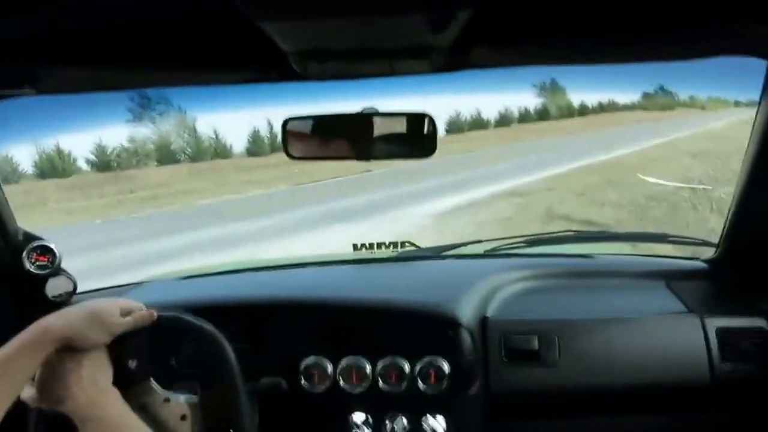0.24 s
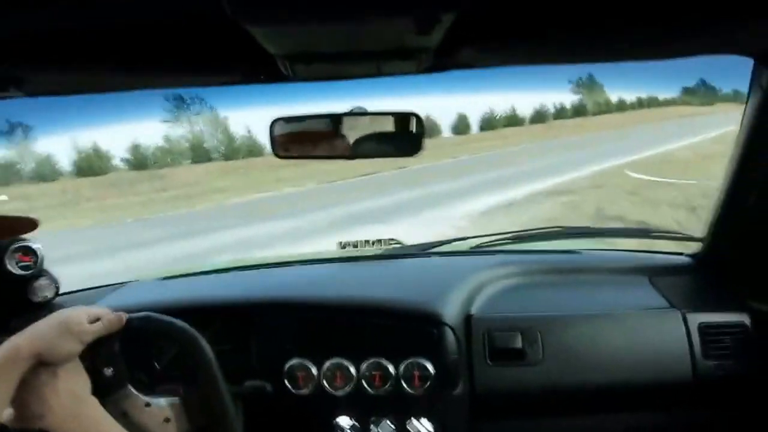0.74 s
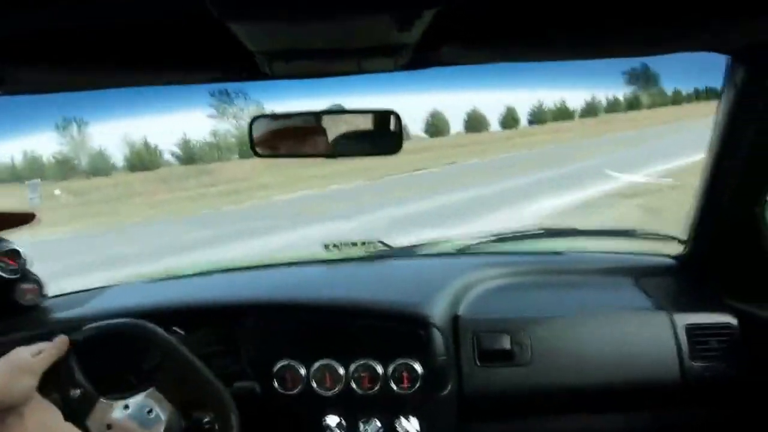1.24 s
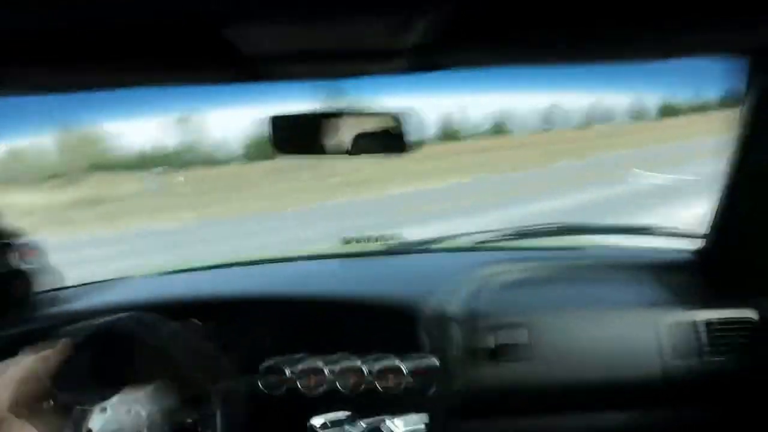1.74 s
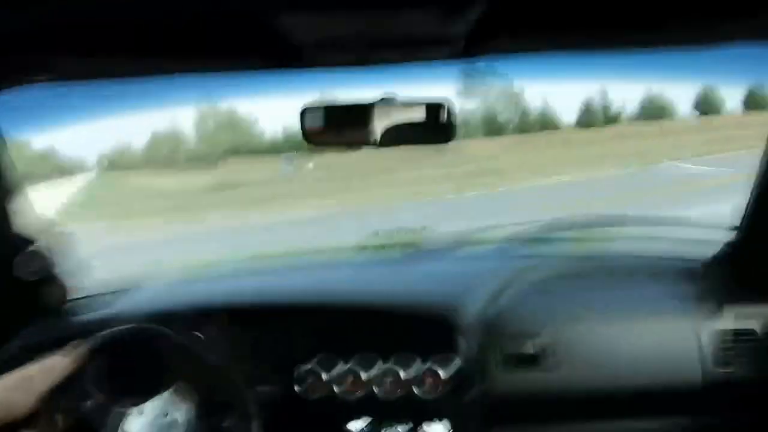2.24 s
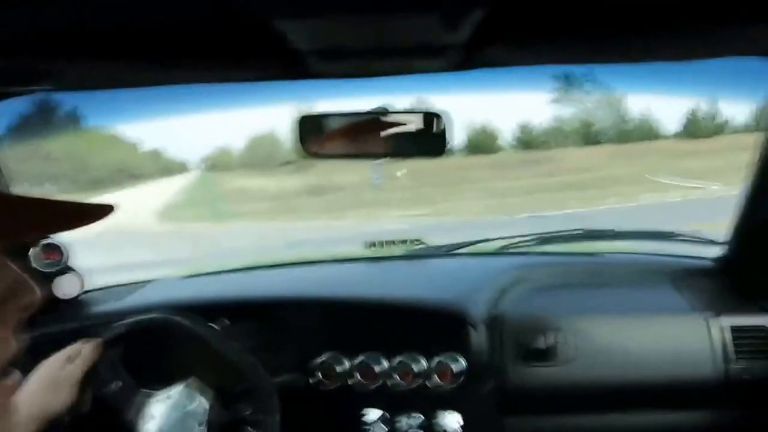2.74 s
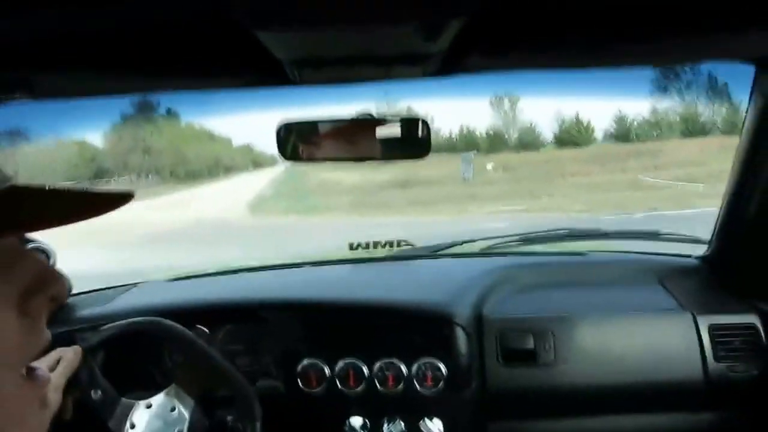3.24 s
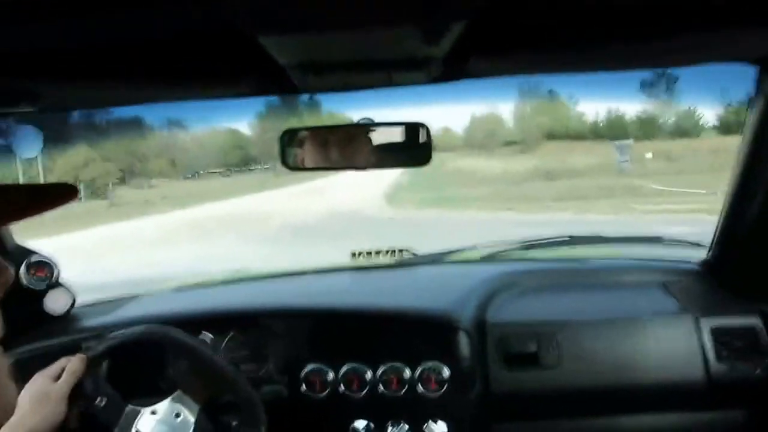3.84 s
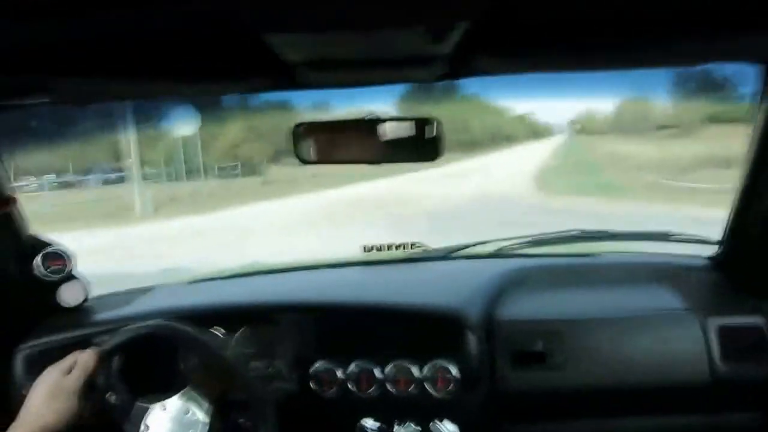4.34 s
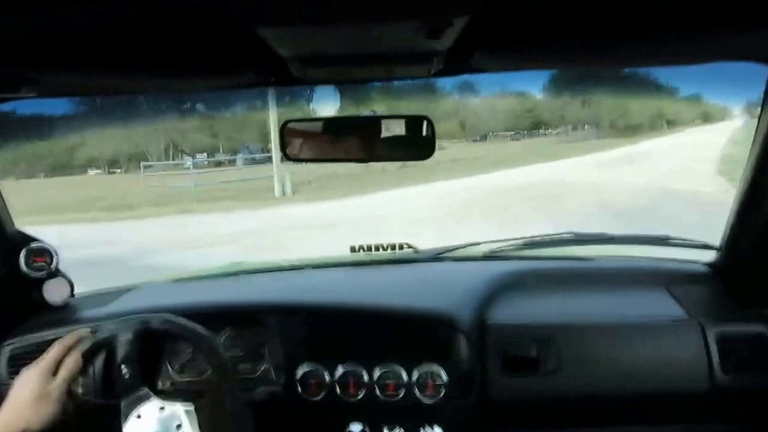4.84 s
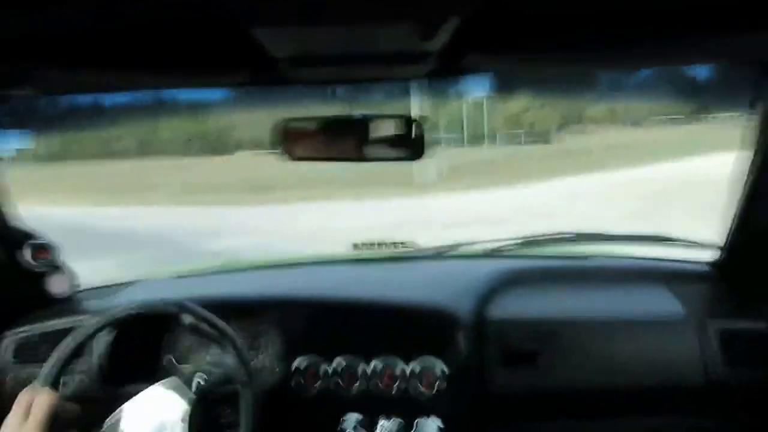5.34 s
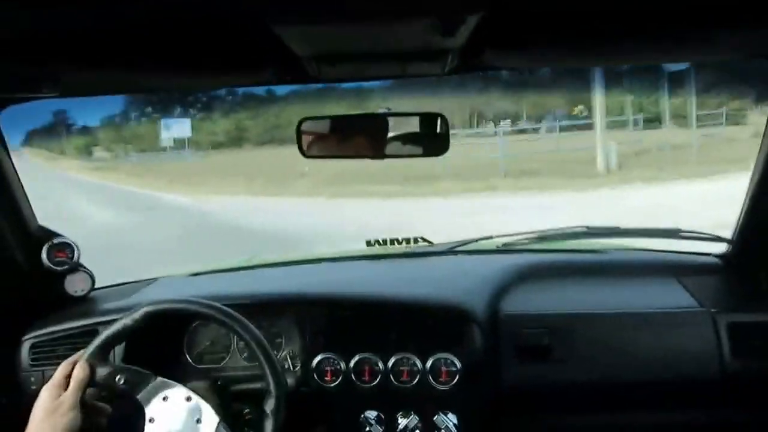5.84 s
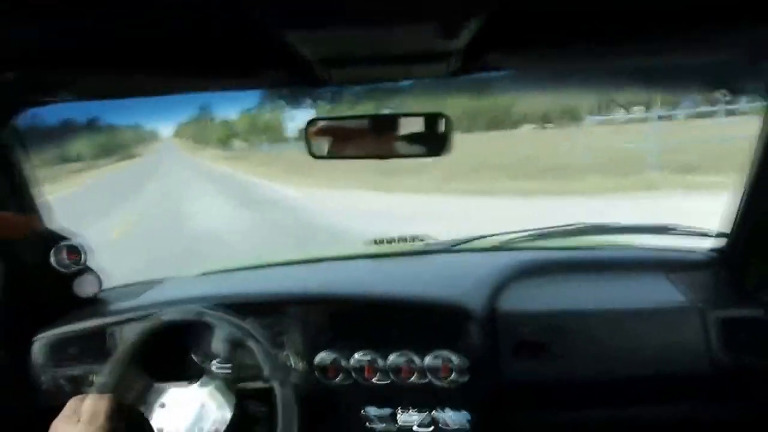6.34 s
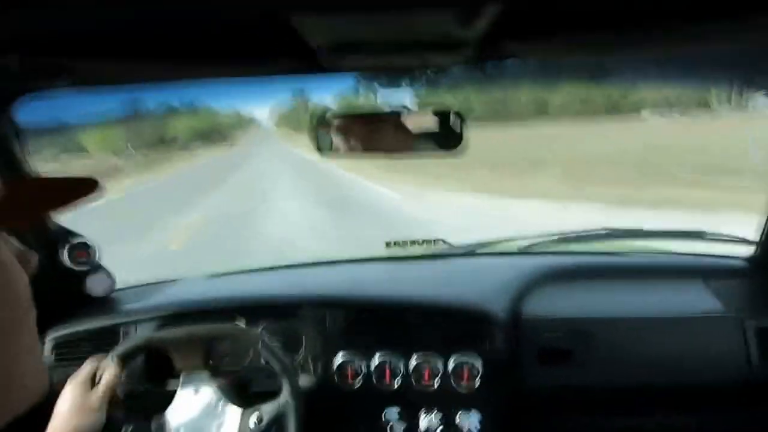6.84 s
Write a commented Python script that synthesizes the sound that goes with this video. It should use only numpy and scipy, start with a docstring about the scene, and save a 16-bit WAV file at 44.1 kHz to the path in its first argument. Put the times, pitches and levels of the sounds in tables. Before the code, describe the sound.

Inside a moving car, a deep engine drone sags, rises and sags again, with bursts of hard plastic rattle, then climbs toward the end.

```python
"""Inside the cabin of a moving car, a camera on a mount hears the engine beat rise, sag and rise again.
The engine is a stack of tones locked to its turns and coloured by the cabin, over a noise rumble.
Shaking makes the camera housing buzz and, in spells, knock on its mount: small and large blows set
it ringing, in opposite phase at the two microphones. Trim rasps with the shaking.
A faint whine, treble hiss and the swish of hands on the wheel are shaped noise."""
import sys
import numpy as np
from scipy import signal
from scipy.fft import rfft, irfft, next_fast_len
from scipy.io import wavfile
from scipy.ndimage import uniform_filter1d

SR = 44100
rng = np.random.default_rng(int(sys.argv[2]) if len(sys.argv) > 2 else 0)


def store_wav(level_fs):
    """Save 16-bit WAV to argv[1]."""
    pcm = np.round(np.clip(np.atleast_2d(level_fs), -1, 1) * 32767)
    wavfile.write(sys.argv[1], SR, pcm.T.astype(np.int16))


N = 313103   # length in samples

# An "order" is a tone at a whole number of times the engine's turning rate.
# engine speed: t/s, speed/turns per s
ENGINE_SPEED = [(0.0, 43.81), (0.25, 42.57), (0.5, 40.8), (0.9, 38.44), (1.36, 38.36), (1.62, 35.17),
                (1.74, 32.7), (1.85, 30.72), (2.06, 38.0), (2.16, 42.15), (2.29, 46.59), (2.5, 48.77),
                (2.9, 44.94), (3.2, 41.69), (3.42, 38.84), (3.66, 41.55), (3.9, 50.32), (4.05, 50.53),
                (4.35, 44.68), (4.6, 38.72), (4.81, 35.92), (5.3, 39.92), (5.7, 43.16), (6.1, 46.22),
                (6.45, 48.94), (7.1, 54.11)]
# throttle, as the common level of the low orders before exhaust and cabin shares: t/s, level/dB
THROTTLE = [(0, -22.3), (.45, -22), (.9, -22.5), (1.36, -22.5), (1.6, -25), (1.72, -29), (1.85, -30),
            (2.06, -32.7), (2.2, -25), (2.32, -25), (2.5, -25.5), (2.9, -29), (3.2, -30), (3.42, -30.5),
            (3.62, -27), (3.78, -23), (3.92, -22.5), (4.05, -27), (4.35, -28), (4.6, -32), (4.81, -32),
            (5.3, -27), (5.7, -23.6), (6.1, -20.5), (6.45, -27), (6.75, -29.5), (7.1, -25.5)]
# strength of orders 1 to 5 at the exhaust, with three firings a turn: level/dB
LOW_ORDERS_DB = [-0.1, 0.63, 3.5, -0.52, -0.35]
# strength of orders 6 to 13 at the exhaust: level/dB
UPPER_ORDERS_DB = [2, 2, -0.5, -1.5, 1.0, -3.5, -6, -4.5]
# how the cabin passes the low orders: f/Hz, level/dB
CABIN_LOW = [(30, -3), (38, 4.5), (44, -2.6), (54, -0.5), (72, -4.7), (82, 3.5), (92, -1), (104, 8.5),
             (113, 5.5), (121, 0), (131, 3.5), (143, 1), (155, -2), (175, -3.9), (200, -2.5), (220, -1.5),
             (240, -2), (270, -15.5)]
# how the cabin passes orders 6 to 13, against the low orders together: f/Hz, level/dB
CABIN_UPPER = [(190, -21), (232, -14), (260, -29), (285, -26), (310, -27.5), (345, -36), (385, -27),
               (420, -49.5), (460, -29.5), (540, -67)]
# orders 6 to 13 carried by the mount, against the low orders together: f/Hz, level/dB
MOUNT_CARRIED = [(240, -47), (285, -44.5), (325, -49), (365, -25.5), (410, -48), (540, -53.5)]
# colour of the road and body rumble: f/Hz, level/dB per Hz
RUMBLE_COLOUR = [(25, -10.5), (60, -6.5), (140, -2.5), (250, -5), (340, -7.5), (420, -13.5), (460, -9),
                 (510, -18), (700, -20.5), (1200, -32), (2300, -37), (3500, -49.5), (6000, -53.5)]
# ringing of the rasping trim: f/Hz, level/dB, time to die by 60 dB/s
TRIM_MODES = [(1350, -1.5, 0.0032), (1670, -8, 0.02), (2718, 6.5, 0.0034), (3260, -3.5, 0.0069),
              (4600, -6, 0.0023), (12700, -14.5, 0.0018)]
# the whine's one resonance: f/Hz, level/dB, time to die by 60 dB/s
WHINE_MODE = [(2320, 0, 0.033)]
# ringing of the camera housing: f/Hz, level/dB, time to die by 60 dB/s
HOUSING_MODES = [(370, -8, .015), (590, -6, .026), (855, -2, .03), (1085, -1, .032), (1340, -4, .032),
                 (1650, -9, .014), (1930, -12, .016), (2500, -19, .012)]
# ringing of the dash panel, heard through the air: f/Hz, level/dB, time to die by 60 dB/s
PANEL_MODES = [(537, -15, 0.0076), (894, -15.5, 0.013), (1102, -28, 0.073), (1490, -14, 0.0022),
               (1992, -34.5, 0.04), (2730, -25.5, 0.011)]
# colour of the bright contact ticks: f/Hz, level/dB per Hz
TICK_COLOUR = [(2500, 3), (5000, 7.5), (8000, -0.5), (12000, 2), (16000, -4.5)]
# spells of loose rattle: start t/s, end t/s, level/dB before softening and the mount
RATTLE_SPELLS = [(1.71, 1.944, -23.5), (2.02, 2.1, -18.5), (2.194, 2.316, -22), (2.52, 2.83, -18.5),
                 (3.97, 4.335, -22.5), (6.274, 6.806, -19.5), (6.9, 7.1, -26)]
# the loudest knocks and lone ticks: t/s, blow level/dB before ringing, tick level/dB before smoothing
LOUD_KNOCKS = [(1.6728, -10, -29), (1.6986, -8, -50), (1.7105, -5, -29), (1.728, -6.5, -22),
               (1.7674, -14, -49), (1.7956, -9.5, -29), (1.8457, -10.5, -53), (1.8559, -8.5, -23),
               (1.8893, -10, -24), (1.909, -13.5, -46), (1.9409, -10, -29), (1.972, -9, -28),
               (2.0345, -13, -33), (2.046, -14, -38), (2.158, -12.5, -39), (2.2273, -10, -35),
               (2.252, -8.5, -46), (2.2623, -14, -27), (2.3197, -10, -40), (2.3275, -25, -27),
               (2.3921, -12.5, -27), (2.5163, -32, -21.5), (2.5316, -9.5, -44), (2.5712, -17, -50),
               (2.5796, -11, -23), (2.6405, -14.5, -34), (2.662, -15, -26), (2.6828, -9, -27),
               (2.7053, -10, -29), (2.747, -12, -30), (2.769, -13, -34), (2.8106, -13, -37),
               (2.8448, -9, -34), (2.9178, -15.5, -32), (3.0405, -39, -31.5), (3.2868, -42, -35),
               (3.5967, -47, -31.5), (3.9868, -9.5, -30), (4.0318, -10.5, -28), (4.0534, -12.5, -25),
               (4.0718, -13, -29), (4.0938, -10.5, -27), (4.1293, -10.5, -30), (4.1677, -11, -28),
               (4.2302, -11.5, -36), (4.2751, -9, -30), (4.298, -11.5, -25), (4.3183, -13, -30),
               (4.3392, -9.5, -30), (4.3609, -9.5, -29), (4.681, -32, -36), (4.7666, -31, -34),
               (5.507, -52, -31), (5.7506, -45, -32.5), (6.209, -17.5, -31.5), (6.268, -10, -50),
               (6.2752, -9.5, -30), (6.316, -11, -29), (6.3389, -11, -33), (6.3595, -10, -30),
               (6.38, -13, -25), (6.4213, -13, -38), (6.464, -10.5, -28), (6.4858, -12.5, -30),
               (6.519, -13.5, -40), (6.5477, -16, -28), (6.5814, -11.5, -30), (6.6226, -9, -31),
               (6.6497, -10, -25.5), (6.6661, -17, -36), (6.6887, -11, -25), (6.7295, -10, -30),
               (6.7663, -10, -32), (6.804, -19, -48), (7.0701, -44, -31)]
# colour of the treble hiss and hand swish: f/Hz, level/dB per Hz
HISS_COLOUR = [(2350, -45), (4000, -1), (5950, 0), (6750, 1.5), (8110, 3.5), (12700, 6.5), (14700, -9),
               (15800, -23.5)]
# hands sliding on the wheel: middle t/s, length/s, level/dB at the middle before the waver
HAND_SLIDES = [(5.08, 0.32, -58.5), (5.23, 0.23, -61), (5.345, 0.19, -60), (5.58, 0.37, -57.5),
               (6.023, .45, -55)]

BOOM_HZ, BOOM_Q, START_RAD = 125.0, 1.6, 2.4   # cabin boom; engine angle at the start
LEFT_CUT_HZ, LEFT_DB = 90.0, 2.4               # bass leak and gain, for airborne engine sound
# body shake: peak and half-width in turns per s, dB of shake per dB of throttle, reference throttle
SHAKE_HZ, SHAKE_WIDTH_HZ, SHAKE_PER_DB, OPEN_DB = 39.28, 0.64, 1.64, -22
RUMBLE_DB = -14.5                              # against the low orders together
RASP_DB, RASP_FOLLOWS = -41.5, 1.19            # rasp at 0 dB shake; dB of rasp per dB of shake
RASP_IN_SPELL_DB = -33                         # rasp against the level of a rattle spell
BUZZ_DB, BUZZ_FOLLOWS = -23.5, 0.78            # before softening and mount; dB per dB of shake
BORNE_DB = -2.5                                # housing ring that reaches the microphones
SPELL_RISE_DB_PER_S, SPELL_FALL_DB_PER_S = 90, 89
# lighter knocks: angle in the turn, chance per turn
LIGHT_RAD, LIGHT_SHARE = 0.866, .6
# their blow and tick against the spell, before the scatter; scale of the scatter
LIGHT_DB, LIGHT_TICK_DB, LIGHT_SPREAD_DB = -1.5, -26.5, 2
HISS_DB, HISS_FOLLOWS = -64.5, 0.44            # hiss at 0 dB shake; dB per dB of shake
CUTOFF_HZ = 15800                              # top of the microphones' range
OPPOSITE = [[1], [-1]]                         # left and right in opposite phase


def from_db(db):
    """Turn decibels into a plain gain."""
    return np.exp(np.asarray(db) * (np.log(10) / 20))


def power_sum(*levels_db):
    """Level in dB of several unrelated sounds together."""
    return 10 * np.log10(sum(from_db(2 * np.asarray(db)) for db in levels_db))


def rms_one(x):
    """Scale a sound to an rms level of 1."""
    return x / np.sqrt(np.mean(x ** 2) + 1e-20)


def in_time(rows):
    """Join the points of a time table with straight lines, one curve per column."""
    s, *columns = np.transpose(rows)
    return [np.interp(np.arange(N) / SR, s, column) for column in columns]


def at_hz(points, hz):
    """Read a level off a frequency table, joining its points on a log scale."""
    table = np.array(points)
    return np.interp(np.log(hz), np.log(table[:, 0]), table[:, 1])


def drift(rate):
    """Slow random wander of spread 1, around a rate in Hz."""
    step = 40   # made at a 40th of the sample rate, then joined up
    r = np.exp(-2 * np.pi * step * rate / SR)
    noise = rng.standard_normal(N // step + 2002)
    slow = signal.lfilter([1], [1, -2 * r, r * r], noise)[2000:]
    return np.interp(np.arange(N) / step, np.arange(len(slow)), rms_one(slow))


def coloured(spectrum, alike):
    """Steady stereo noise with a given colour and left-right likeness, at rms 1."""
    size = next_fast_len(N)
    hz = np.maximum(np.fft.rfftfreq(size, 1 / SR), 1)
    gain = from_db(at_hz(spectrum, hz))
    mid, side = irfft(rfft(rng.standard_normal((2, size))) * gain, size)[:, :N]
    alike = np.clip(alike, -1, 1)
    return rms_one(np.sqrt(1 + alike) * mid + np.sqrt(1 - alike) * side * OPPOSITE)


def ring(clicks, modes, scatter_db):
    """Clicks set each mode ringing with a wandering share; neighbouring modes swing in opposite sense."""
    out = 0
    for k, (hz, level_db, t60) in enumerate(modes):
        r = from_db(-60 / (t60 * SR))
        w = 2 * np.pi * hz / SR
        share = (-1) ** k * from_db(level_db + scatter_db * drift(29))
        driven = clicks * share + 1e-18
        out = out + signal.lfilter([0, np.sin(w)], [1, -2 * r * np.cos(w), r * r], driven)
    return out


def touches(angle, per_s, turn, depth):
    """Dense small contacts, strongest at one angle (rad) of each turn, with a wandering strength."""
    bunch = np.exp(depth * np.cos(angle - turn) + .18 * drift(25))
    return (rng.random(N) < per_s / SR) * rng.uniform(-1.24, 1, N) * bunch


def engine(turns, throttle_db):
    """Tones locked to the turning engine; the cabin boom shifts their timing and colours the low ones."""
    angle = START_RAD + 2 * np.pi * np.cumsum(turns) / SR
    air, carried = 0, 0
    low_db = [throttle_db + db + at_hz(CABIN_LOW, (k + 1) * turns) for k, db in enumerate(LOW_ORDERS_DB)]
    load_db = power_sum(*low_db)
    for k in range(1, 14):
        hz = k * turns
        low = k <= len(low_db)
        if low:
            level_db = low_db[k - 1]
        else:
            level_db = load_db + at_hz(CABIN_UPPER, hz) + UPPER_ORDERS_DB[k - 6] + 2.8 * drift(3.3)
        lag = 1.5 * np.arctan2(hz / BOOM_HZ / BOOM_Q, 1 - (hz / BOOM_HZ) ** 2) - 3.35
        wobble = .02 * k * drift(9)      # small unevenness in the beat
        wave = np.sqrt(2) * np.cos(k * angle - lag + wobble)
        air = air + from_db(level_db + 0.57 * drift(2.3)) * wave
        if not low:
            carried = carried + from_db(load_db + at_hz(MOUNT_CARRIED, hz)) * wave
    return np.array([left_port(air) + carried, air - carried]), angle, load_db


def left_port(x):
    """The left microphone loses bass through a leak, and is a little louder above it."""
    return from_db(LEFT_DB) * signal.lfilter(*signal.butter(1, LEFT_CUT_HZ, "high", fs=SR), x)


def shake(turns, throttle_db):
    """Body shake in dB: a resonance in engine speed plus throttle; 0 dB at its peak at OPEN_DB."""
    off_peak = (turns - SHAKE_HZ) / SHAKE_WIDTH_HZ
    return SHAKE_PER_DB * (throttle_db - OPEN_DB) - 10 * np.log10(1 + off_peak ** 2)


def road_rumble(load_db):
    """Road and body rumble: coloured noise that follows the engine level with a slow waver."""
    waver_db = 1.2 * drift(8)
    return from_db(load_db + RUMBLE_DB + waver_db) * coloured(RUMBLE_COLOUR, alike=0.42)


def trim_rasp(angle, level_db):
    """Many small contacts ring the trim; part is shared by the microphones, part is in opposite phase."""
    shared, own = (rms_one(ring(touches(angle, per_s=5000, turn=5.5, depth=.8), TRIM_MODES, scatter_db=2))
                   for _ in range(2))
    return from_db(level_db) * (shared + 0.6 * own * OPPOSITE)


def whine():
    """Noise through one narrow resonance makes a faint, wavering whine."""
    return from_db(-65.5) * rms_one(ring(rng.standard_normal(N), WHINE_MODE, scatter_db=0))


def housing(angle, spell_db, buzz_db):
    """Contacts ring the housing in opposite phase, ring the panel through the air, and tick brightly."""
    blows, ticks = knocks(angle, spell_db)
    small = touches(angle, per_s=4000, turn=6.0, depth=.7)
    small_ring = np.std(ring(small, HOUSING_MODES, scatter_db=-0.5))
    force = blows + small / small_ring * from_db(buzz_db)
    # plastic on plastic: a soft contact
    soft = signal.sosfilt(signal.butter(4, 2600, fs=SR, output="sos"), force)
    borne = ring(soft, HOUSING_MODES, scatter_db=3.0) * from_db([[-.4], [.4]]) * OPPOSITE
    air = ring(soft, PANEL_MODES, scatter_db=1.5)
    contacts = ticks + np.abs(force) * from_db(-38.5)
    burst = signal.lfilter([1], [1, -np.exp(-1 / (0.00039 * SR))], contacts)
    burst = uniform_filter1d(burst, size=200)
    bright = burst * coloured(TICK_COLOUR, alike=0.75) * from_db([[1.5], [-1.5]])
    return from_db(BORNE_DB) * borne + air + bright


def spells():
    """Level of the loose rattle in dB: each spell rises, holds and falls."""
    t = np.arange(N) / SR
    levels = []
    for start, end, db in RATTLE_SPELLS:
        rise = SPELL_RISE_DB_PER_S * np.maximum(start - t, 0)
        fall = SPELL_FALL_DB_PER_S * np.maximum(t - end, 0)
        levels.append(db - rise - fall)
    return np.max(levels, axis=0)


def knocks(angle, spell_db):
    """Sharp blows amid some milliseconds of chatter, and the strength of their bright ticks."""
    rows = np.array(LOUD_KNOCKS)
    at = (rows[:, 0] * SR).astype(int)
    # lighter knocks fall at one angle of the turn, kept clear of the listed ones
    turn = np.flatnonzero(np.diff(np.floor((angle - LIGHT_RAD) / (2 * np.pi))))
    chance, size, shine = rng.random((400, 3))[:len(turn)].T
    clear = np.abs(turn[:, None] - at).min(axis=1) > .012 * SR
    light = (chance < LIGHT_SHARE) & clear
    light_db = spell_db[turn] + LIGHT_DB + LIGHT_SPREAD_DB * (2 * size - 2.5)
    light_tick_db = spell_db[turn] + LIGHT_TICK_DB + 2 * LIGHT_SPREAD_DB * (2 * shine + 3)
    blows, ticks = np.zeros((2, N))
    blows[turn] = light * -from_db(light_db)
    ticks[turn] = light * from_db(light_tick_db)
    blows[at] = -from_db(rows[:, 1])
    ticks[at] = from_db(rows[:, 2])
    after = signal.lfilter([1], [1, -np.exp(-1 / (.005 * SR))], blows)
    small_hits = (rng.random(N) < 5000 / SR) * rng.uniform(-1.78, 1, N) * 0.5
    return blows + uniform_filter1d(after, size=130) * small_hits, ticks


def hiss_and_hands(shake_db):
    """Treble noise: a faint floor that follows the shake, swelling as hands slide along the wheel."""
    t = np.arange(N) / SR
    slides = sum(from_db(db) * np.cos(np.pi * np.clip((t - middle) / length, -.5, .5)) ** 2
                 for middle, length, db in HAND_SLIDES)
    floor = from_db(HISS_DB + HISS_FOLLOWS * shake_db)
    waver_db = 1.2 * drift(20)
    return np.hypot(floor, slides) * from_db(waver_db) * coloured(HISS_COLOUR, alike=.35)


def scene():
    """Add up all the sounds at the two microphones."""
    (turns,), (throttle_db,) = in_time(ENGINE_SPEED), in_time(THROTTLE)
    spell_db = spells()
    beat, angle, load_db = engine(turns, throttle_db)
    shake_db = shake(turns, throttle_db)
    rumble = road_rumble(load_db)
    rasp_db = power_sum(spell_db + RASP_IN_SPELL_DB, RASP_DB + RASP_FOLLOWS * shake_db)
    rasp = trim_rasp(angle, rasp_db)
    buzz_db = power_sum(spell_db, BUZZ_DB + BUZZ_FOLLOWS * shake_db)
    rattle = housing(angle, spell_db, buzz_db)
    return beat + rumble + rasp + whine() + rattle + hiss_and_hands(shake_db)


def record(dry):
    """Round off the peaks, then cut the highest treble."""
    rounded = 1.2 * np.tanh(dry / 1.2)
    return signal.sosfilt(signal.ellip(10, .5, 70, CUTOFF_HZ, fs=SR, output="sos"), rounded)


dry = scene()
out = record(dry)
store_wav(out)
```